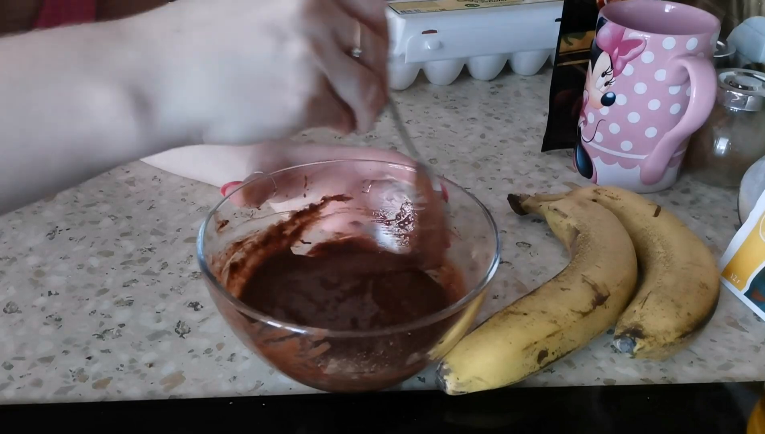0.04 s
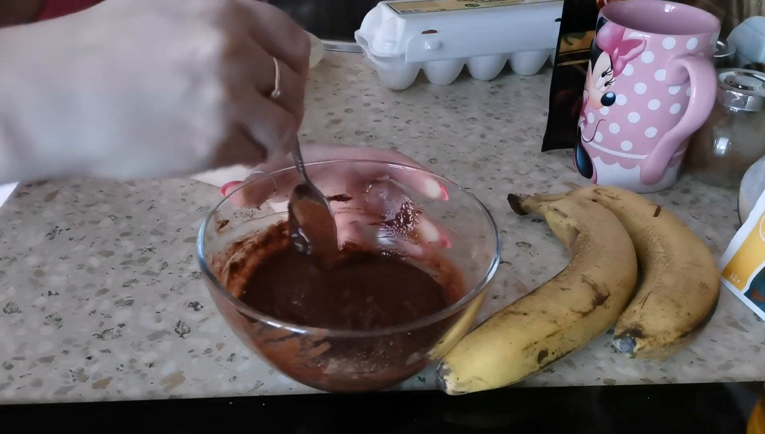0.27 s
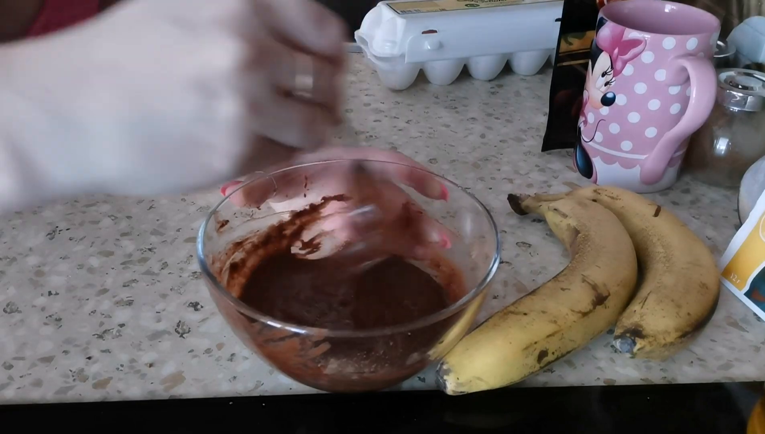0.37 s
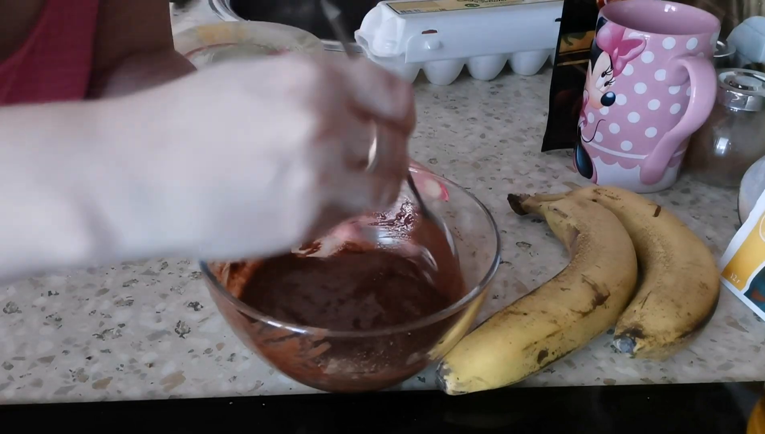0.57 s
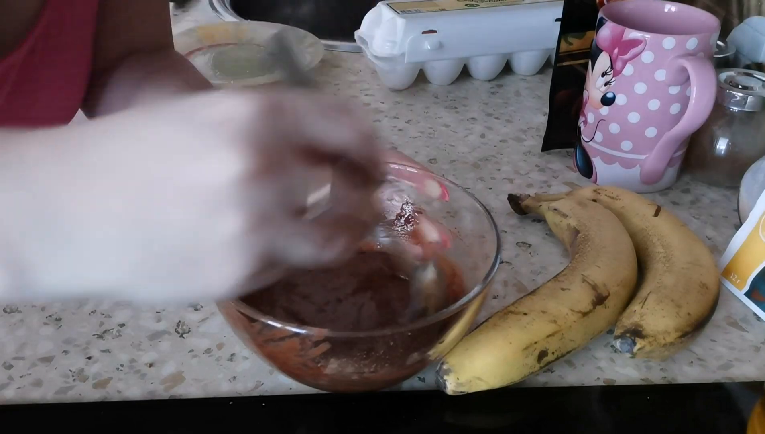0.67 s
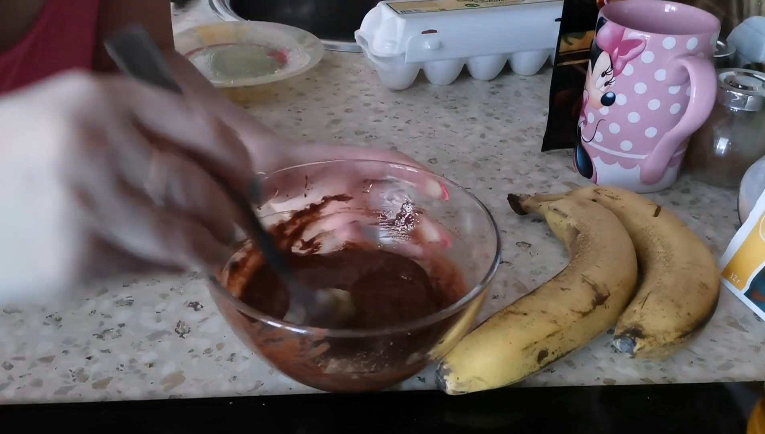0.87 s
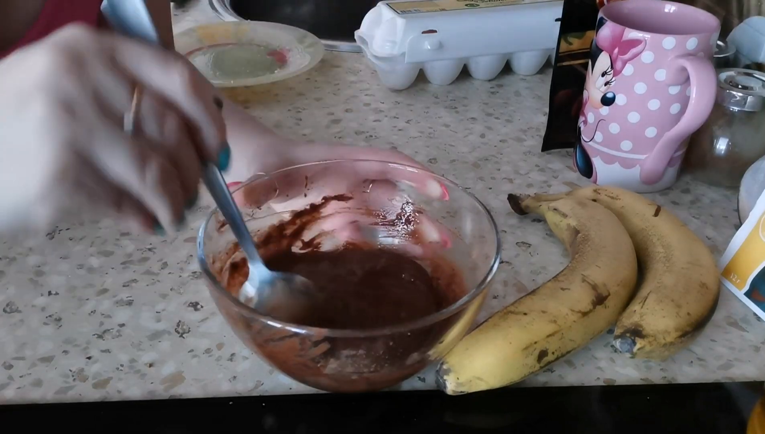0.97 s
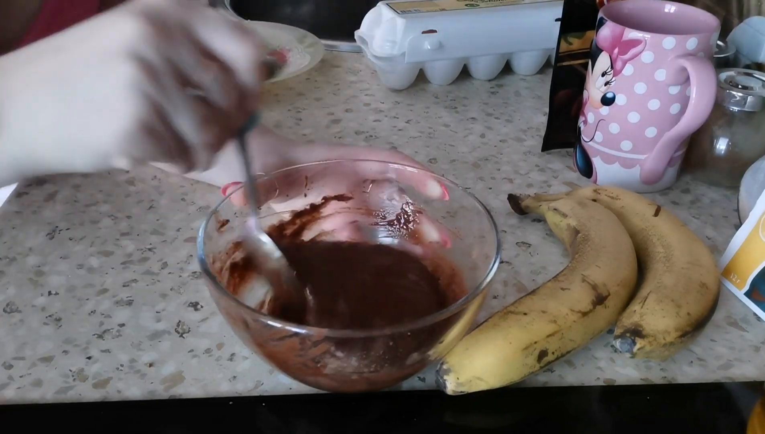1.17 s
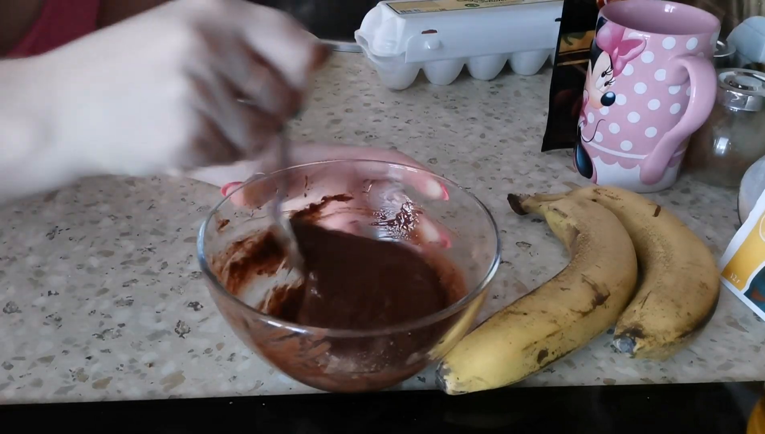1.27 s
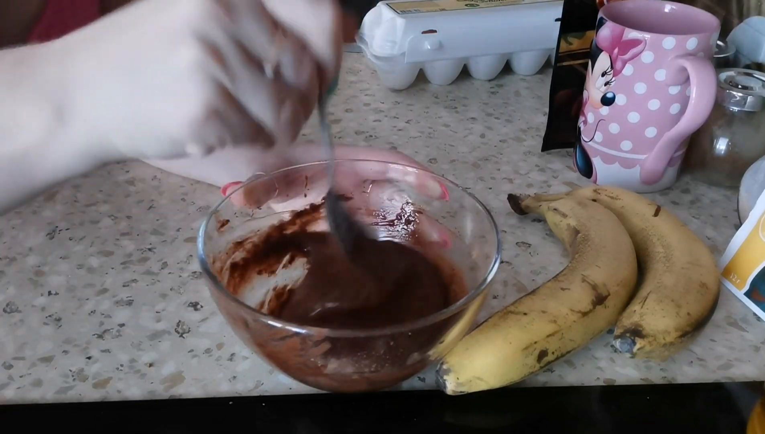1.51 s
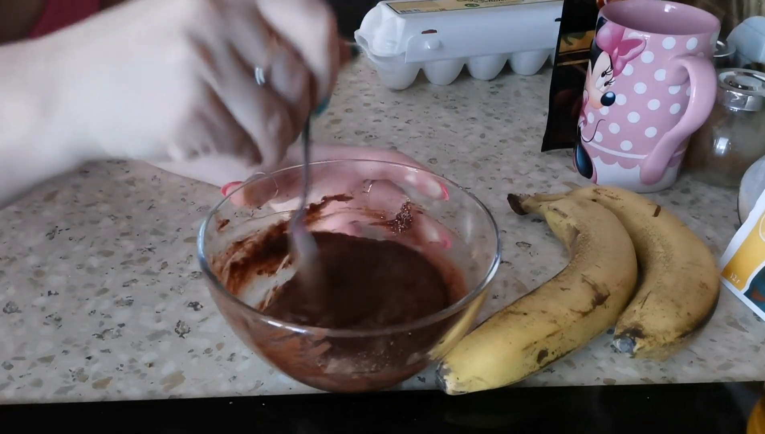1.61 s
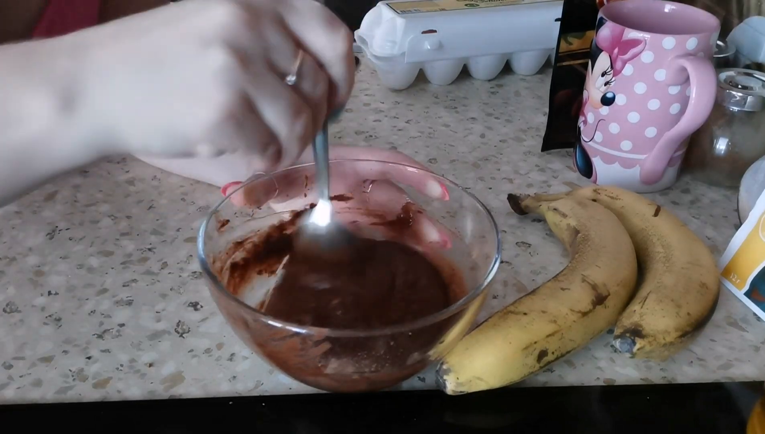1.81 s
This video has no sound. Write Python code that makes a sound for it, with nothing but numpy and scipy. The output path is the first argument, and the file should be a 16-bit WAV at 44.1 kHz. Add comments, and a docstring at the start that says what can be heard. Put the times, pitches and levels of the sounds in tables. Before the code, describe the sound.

Close by in a quietly humming kitchen, a spoon stirring batter hits its glass bowl with two sharp, quickly damped clinks, then goes on softly scraping and ticking along the glass.

```python
"""Spoon on a glass bowl

A metal spoon knocks twice on a glass bowl of batter. The glass rings, the batter damps it,
and the kitchen counter thuds. Between and after the knocks the spoon scrapes, ticks and rubs.
A small hard room answers each knock, and the house hums quietly underneath."""
import sys
import numpy as np
from scipy import signal
from scipy.fft import rfft, irfft
from scipy.io import wavfile
from scipy.ndimage import uniform_filter1d

SR = 44100
rng = np.random.default_rng(int(sys.argv[2]) if len(sys.argv) > 2 else 0)


def wav_out(sig):
    """Save sig, one row per channel (or a flat mono array), as 16-bit PCM at SR to the path in sys.argv[1]."""
    wavfile.write(sys.argv[1], SR, np.round(np.clip(np.atleast_2d(sig).T, -1, 1) * 32767).astype(np.int16))


N = 81585


def undb(db):
    return 10 ** (np.asarray(db) / 20)


def pan(db):
    """Left and right gains, the left louder by db."""
    return undb(np.array([[db], [-db]]) / 2)


def fade(t, t60):
    """Silent before t = 0, then falls 60 dB in t60 seconds: the fade time."""
    return (t >= 0) * np.exp(-np.log(1000) * np.maximum(t, 0) / t60)


def unit(x):
    return x / np.sqrt(np.mean(x ** 2))


def band(x, hz, q):
    """Keeps the sound near hz; a higher q is narrower."""
    return signal.lfilter(*signal.iirpeak(min(hz, .45 * SR), q, fs=SR), x)


def highpass(x, hz):
    return signal.lfilter(*signal.butter(1, hz, "high", fs=SR), x)


def wander(per_second):
    """A smooth random wobble."""
    hold = int(SR / per_second)
    steps = np.repeat(rng.standard_normal(N // hold + 1), hold)
    return 1.7 * uniform_filter1d(uniform_filter1d(steps, hold), hold)[:N]


# The house's noise before the bass boost. Each row: frequency in Hz, level in dB per Hz.
HOUSE_NOISE = [(25, -84.5), (35, -82.5), (50, -78), (70, -88.5), (136, -77.5), (237, -90), (300, -88),
               (460, -97), (700, -94), (1400, -97.5), (2800, -103), (4800, -105), (7000, -113),
               (8500, -114), (11000, -116), (13000, -116), (16000, -124)]
# The background rumble wavers in level throughout. Each row: time in seconds, bass boost in dB.
RUMBLE_LEVELS = [(0, 11), (.4, 7.5), (.55, 8.5), (.65, 13.5), (.9, 11), (1.05, 9), (1.28, 9.5), (1.45, 8),
                 (1.85, 8.5)]


def house_hum(t):
    """Bands of noise that flicker a little, with the bass alike on both sides."""
    out = np.zeros((2, N))
    freqs, levels = np.array(HOUSE_NOISE).T
    rumble_db = np.interp(t, *np.array(RUMBLE_LEVELS).T)
    for hz in 30 * 2 ** (np.arange(19) / 2):  # half an octave apart
        mid, side = (unit(band(band(rng.standard_normal(N), hz, 2.5), hz, 2.5)) for _ in range(2))
        db = np.interp(np.log(hz), np.log(freqs), levels) + 10 * np.log10(hz / 6)
        db = db + 1.2 * wander(6) + rumble_db / (1 + (hz / 800) ** 2)
        alike = 0.73 / (1 + hz / 388.6)
        out += undb(db) * (np.sqrt(1 + alike) * mid + np.sqrt(1 - alike) * np.array([side, -side]))
    return out


# The spoon's two knocks. Each row: start in seconds, then levels in dB of the click, crack,
# first touch and counter thud, then lean to the left in dB.
SPOON_KNOCKS = [(.2119, 4, -12, -44, -40, 3), (.6761, -8, -12, -25, -29, -1.5)]
# The tones of bowl and spoon. Each row: pitch in Hz, fade time in seconds,
# level in dB at the first knock, level in dB at the second.
BOWL_TONES = [(319, 0.19, -45.5, -37), (419.3, .1, -36.5, -32.5), (536, 0.059, -41.5, -40.5),
              (714.5, 0.054, -23, -24.5), (795, 0.037, -20, -30), (914, 0.11, -31.5, -37.5),
              (1088, 0.018, -43.5, -23.5), (1703, 0.073, -42.5, -31.5), (2407, 0.018, -24.5, -32.5),
              (1689, .55, -39, -64), (1702, .3, -30, -60), (2750, 0.064, -30, -34),
              (3200, 0.32, -53.5, -55), (3333, 0.017, -13, -12.5), (3521, 0.016, -10.5, -22.5),
              (3810, 0.021, -23.5, -15), (4553, 0.021, -24.5, -20), (4950, .02, -16.5, -21),
              (5227, 0.011, -9, -20), (6020, 0.018, -16, -25.5), (6686, 0.0071, -16.5, -12),
              (7615, 0.005, -22.5, -27.5)]
LONG_TONE_S = .2  # tones with a longer fade time belong to glass_ring


def knocks(t):
    """The spoon touches lightly, then hits with a click and a crack that set off the short tones."""
    out = np.zeros((2, N))
    lag_s = np.array([[0], [.00007]])  # the right side hears it later
    for k, (start, click_db, crack_db, touch_db, _, pan_db) in enumerate(SPOON_KNOCKS):
        age = t - start - lag_s
        touch = undb(touch_db) * fade(age + .0032, t60=.019)
        click = undb(click_db) * np.sinc(age * SR) * (np.abs(age) < .001)
        crack = undb(crack_db) * fade(age, t60=.017)
        knock = highpass(click + (touch + crack) * rng.standard_normal((2, N)), hz=1560)
        for hz, t60, *levels in BOWL_TONES:
            # each tone reaches each side at a slightly different time
            shift_s = .00017 * rng.standard_normal((2, 1)) * min(hz / 2500, 1)
            if t60 <= LONG_TONE_S:
                rise = np.clip(age * hz / 2.68, 0, 1)  # low tones take longer to build
                tone = np.sin(2 * np.pi * hz * (age + shift_s))
                knock += undb(levels[k]) * rise * fade(age, t60) * tone
        out += knock * pan(pan_db)
    return out


def glass_ring(t):
    """The long tones outlast each knock; two close pitches beat against each other."""
    out = np.zeros((2, N))
    lag_s = np.array([[0], [.00013]])
    for k, (start, *_) in enumerate(SPOON_KNOCKS):
        age = t - start
        rise = np.clip(age / .0046, 0, 1)
        for hz, t60, *levels in BOWL_TONES:
            if t60 > LONG_TONE_S:
                tone = np.sin(2 * np.pi * hz * (age - lag_s))
                out += undb(levels[k]) * rise * fade(age, t60) * tone
    return out * pan(db=5.5)


def counter_thud(t, hz=113, rise_s=.032):
    """The counter answers each knock with one low tone."""
    out = np.zeros(N)
    for start, _, _, _, thud_db, _ in SPOON_KNOCKS:
        age = t - start
        rise = np.clip(age / rise_s, 0, 1) ** 2
        out += undb(thud_db) * rise * fade(age, t60=.25) * np.sin(2 * np.pi * hz * age)
    return out


def stroke(t, curve, wobble_db):
    """The loudness of a spoon stroke: follows the curve unsteadily, silent outside it."""
    times, levels = np.array(curve).T
    moving = (t > times[0]) * (t < times[-1])
    return moving * undb(np.interp(t, times, levels) + wobble_db * wander(20))


# The spoon drags along the glass. Each row: time in seconds, level in dB.
SCRAPE_LEVELS = [(.3, -83), (.36, -61), (.44, -62.5), (.48, -80), (.84, -86), (.9, -66), (1.051, -60.5),
                 (1.15, -65.5), (1.25, -69), (1.35, -62.5), (1.45, -68), (1.49, -100)]


def scrape(t, slips_per_s=4300):
    """Steel sticks and slips on wet glass, making a stream of tiny uneven clicks."""
    slips = rng.random(N) < slips_per_s / SR
    clicks = slips * rng.standard_normal(N) * undb(3.5 * rng.exponential(size=N))
    return unit(highpass(clicks, hz=4170)) * stroke(t, SCRAPE_LEVELS, wobble_db=1.2)


# Light taps of the spoon. Each row: start in seconds, level in dB, pitch in Hz,
# hiss in dB relative to that level.
SPOON_TICKS = [(0.361, -47.5, 3430, -16), (0.379, -49.5, 10400, 2), (0.4214, -57, 3300, 6),
               (0.8928, -48.5, 5870, -20), (0.9477, -57.5, 3300, 1), (1.0296, -52, 8000, -23),
               (1.0573, -55, 4830, -2), (1.1214, -66, 4640, 2), (1.2108, -62, 7660, -12),
               (1.278, -51.5, 10500, -6), (1.2994, -62, 10800, -8), (1.3503, -58.5, 10700, 7),
               (1.388, -56, 10500, 10), (1.4127, -53, 11930, -1.5), (1.4444, -66, 11800, 0),
               (1.7061, -62.5, 8170, -15), (1.727, -59.5, 4040, 0)]


def ticks(t):
    """Each tap is a short bright hiss with its own ring."""
    out = np.zeros(N)
    for start, db, hz, hiss_db in SPOON_TICKS:
        hiss = highpass(rng.standard_normal(N), hz=4170)
        ring = unit(band(hiss, hz, q=5.4))
        out += undb(db) * fade(t - start, t60=.013) * (ring + undb(hiss_db) * hiss)
    return out


def friction(t, curve, hz, q):
    """Rubbing makes noise, gathered here around one pitch."""
    noise = band(band(rng.standard_normal(N), hz, q), hz, q)
    return unit(noise) * stroke(t, curve, wobble_db=4)


# Brushing before the second knock. Each row: time in seconds, level in dB.
BRUSH_LEVELS = [(.42, -79), (.5, -74), (.62, -72), (.66, -79)]


def dry_brush(t):
    """Dry friction gives a faint, broad hiss."""
    return friction(t, BRUSH_LEVELS, hz=3600, q=.98)


# The spoon rubs in the batter. Each row: time in seconds, level in dB.
RUB_LEVELS = [(.8, -98), (.95, -63), (1.05, -76.5), (1.2, -66.5), (1.3, -70), (1.379, -63.5), (1.46, -94)]


def batter_rub(t):
    """Wet friction gives a lower, rounder noise."""
    return friction(t, RUB_LEVELS, hz=933, q=3.4)


# One thin squeak. Each row: time in seconds, level in dB.
SQUEAK_LEVELS = [(0.988, -90), (1.03, -68.5), (1.082, -76), (1.14, -79), (1.179, -86)]


def squeak(t):
    """Steel on glass gives a noise so narrow it is almost a note."""
    return friction(t, SQUEAK_LEVELS, hz=4680, q=21)


# The room's echo. Each row: frequency in Hz, fade time in seconds, relative level in dB.
ROOM_ECHO = [(149.3, 0.21, -19), (400, 0.78, -20.5), (972, 0.68, -23.5), (1940, 0.71, -29.5),
             (3500, 0.47, -29.5), (6860, 0.44, -29), (11990, 0.28, -27)]


def room(x):
    """The direct sound, a quick answer from the counter and near walls, then a fading echo."""
    age = np.arange(SR) / SR
    bass_filter = signal.butter(2, 998, fs=SR)

    def reflections():
        noise = rng.standard_normal((3, SR))
        sides, shared = noise[:2], noise[2]
        return sides + signal.lfilter(*bass_filter, shared - sides)  # both sides share the bass

    echo = undb(-26.5) * fade(age - .0005, t60=.065) * reflections()
    for hz, t60, db in ROOM_ECHO:
        echo += undb(db - 12.5) * fade(age - .004, t60) * band(reflections(), hz, q=1.6)
    echo[:, 0] = 1  # the direct sound
    return signal.fftconvolve(x, echo, axes=1)[:, :N]


def scene():
    """The spoon sounds through the room; the ring is mostly direct, the thud and hum fully so."""
    t = np.arange(N) / SR
    spoon = knocks(t) + ticks(t) + scrape(t) + batter_rub(t) + squeak(t) + dry_brush(t)
    ring = glass_ring(t)
    return room(spoon + undb(-11) * ring) + ring + counter_thud(t) + house_hum(t)


def colour(x, hz, db, size=2048):
    """Turns each frequency up or down by its gain in dB."""
    freqs = np.maximum(np.arange(size // 2 + 1) * SR / size, 1)
    cepstrum = irfft(np.log(undb(np.interp(np.log(freqs), np.log(hz), db))))
    # fold it so the filter never rings before a sound arrives
    cepstrum[1:size // 2] *= 2
    cepstrum[size // 2 + 1:] = 0
    return signal.fftconvolve(x, irfft(np.exp(rfft(cepstrum))))[:len(x)]


# Left and right tone colour, with the treble cut off above about 15 kHz.
# Each row: frequency in Hz, left gain in dB, right gain in dB.
TONE_COLOUR = [(100.2, -7.5, -4.5), (4600, -2, 0), (6000, -7, 1.5), (6670, -5.5, 1.5), (7900, -33.5, 7),
               (9000, 0, 2), (9620, 1, -3), (10600, 12, -16.5), (11810, 3, -20.5), (14000, -3, -11),
               (14360, -9, -27), (14820, -29.5, -35.5), (15300, -44.5, -54), (16500, -49, -53.5)]


def record(dry):
    """Each side gets its own tone colour; a faint hiss joins and the highest treble is cut."""
    hz, left_db, right_db = np.array(TONE_COLOUR).T
    coloured = np.array([colour(dry[0], hz, left_db), colour(dry[1], hz, right_db)])
    hiss = highpass(rng.standard_normal(dry.shape), hz=5000)
    hiss = signal.sosfilt(signal.cheby1(8, 1, 15000, fs=SR, output="sos"), hiss)
    treble_cut = signal.ellip(8, .2, 70, 16600, fs=SR, output="sos")
    return signal.sosfilt(treble_cut, coloured + undb(-77) * hiss)


dry = scene()
out = record(dry)
wav_out(out)
```